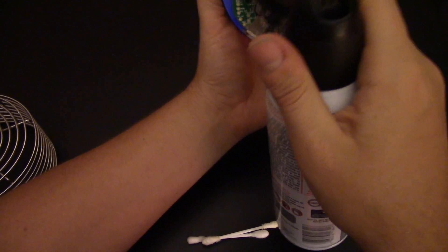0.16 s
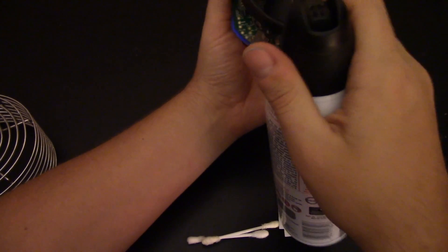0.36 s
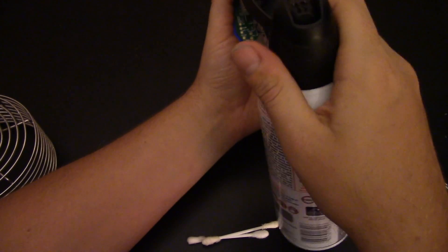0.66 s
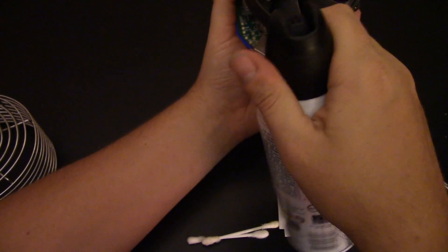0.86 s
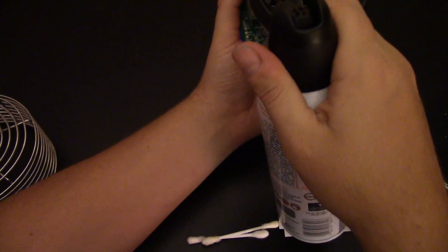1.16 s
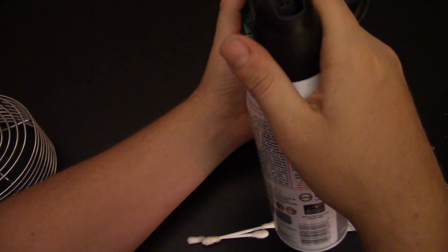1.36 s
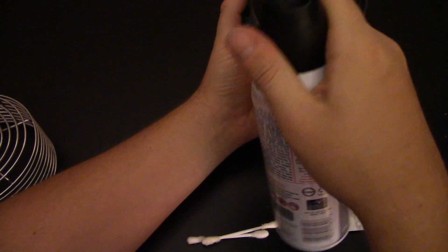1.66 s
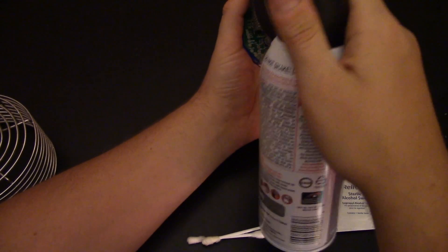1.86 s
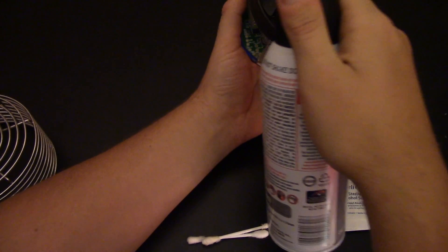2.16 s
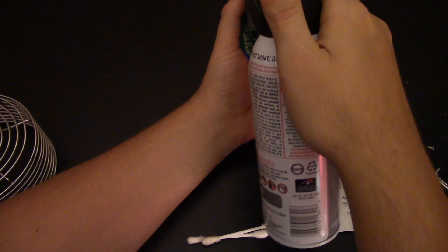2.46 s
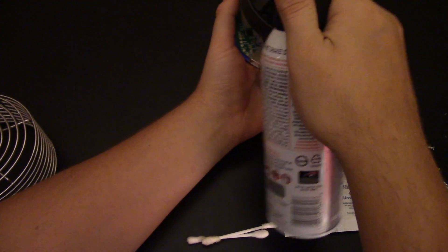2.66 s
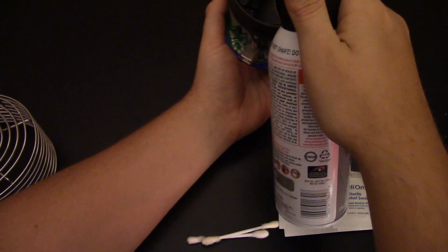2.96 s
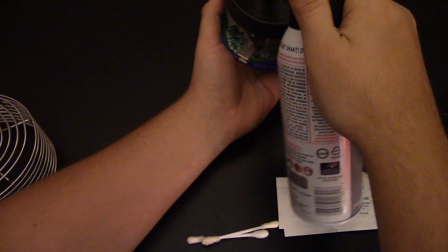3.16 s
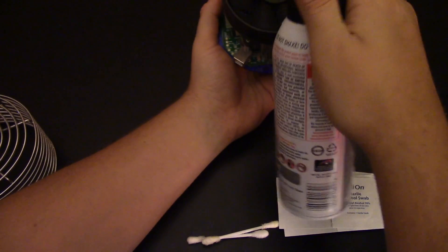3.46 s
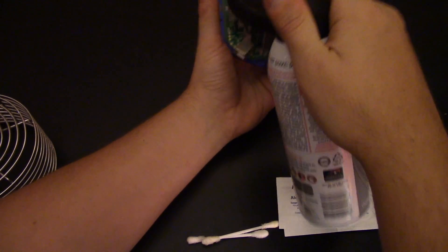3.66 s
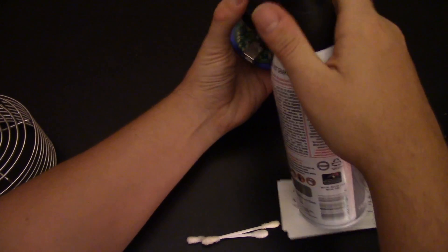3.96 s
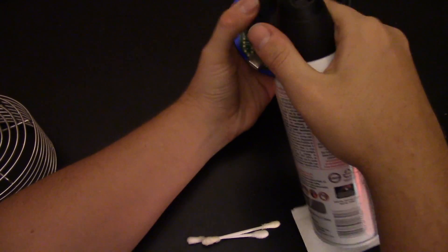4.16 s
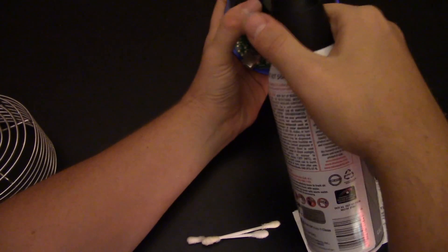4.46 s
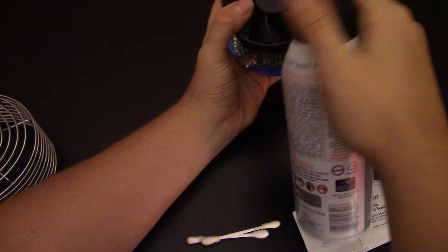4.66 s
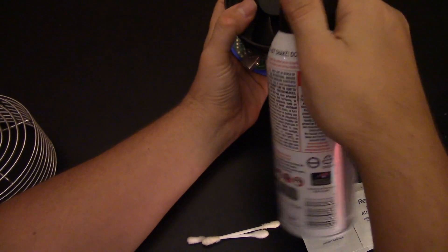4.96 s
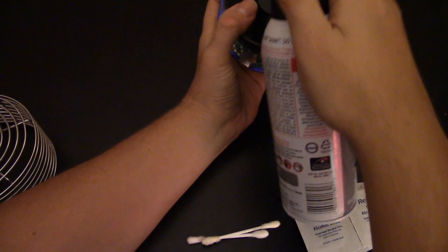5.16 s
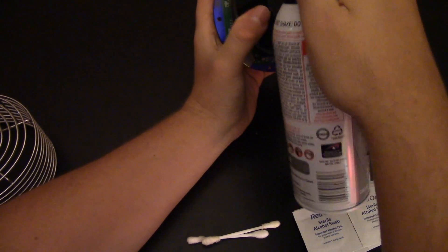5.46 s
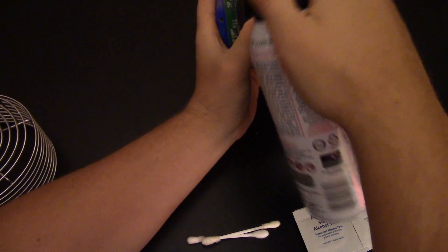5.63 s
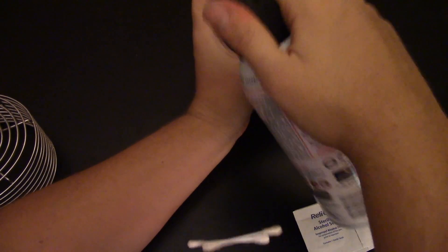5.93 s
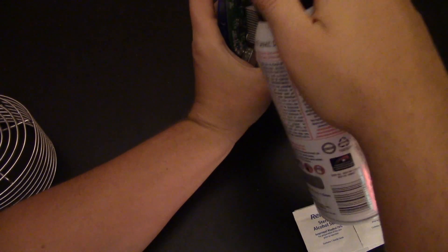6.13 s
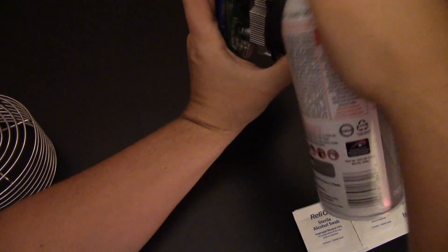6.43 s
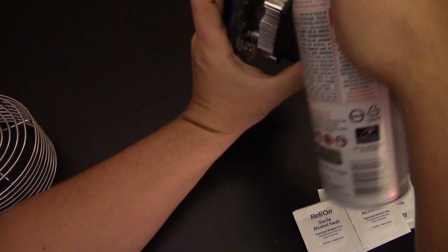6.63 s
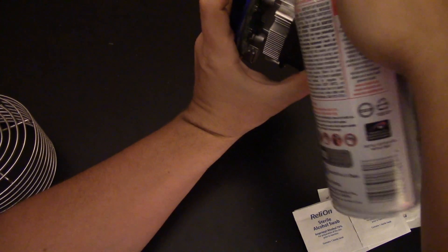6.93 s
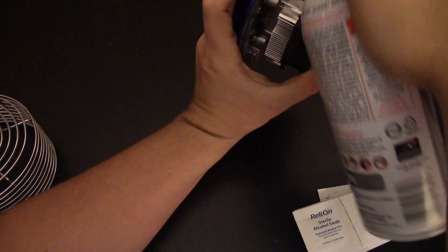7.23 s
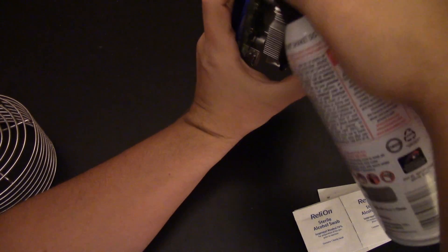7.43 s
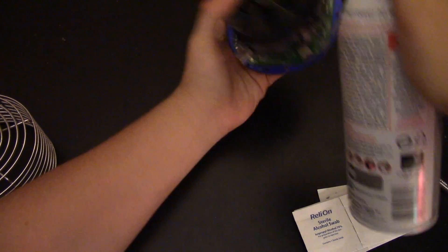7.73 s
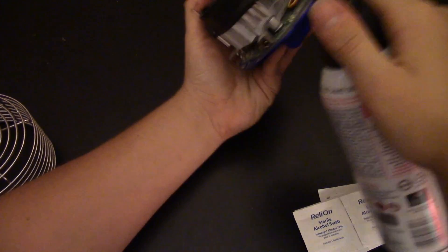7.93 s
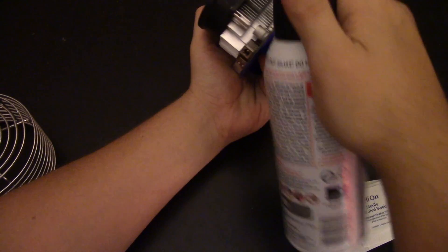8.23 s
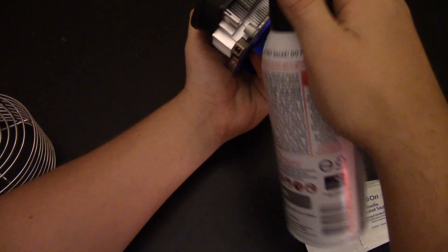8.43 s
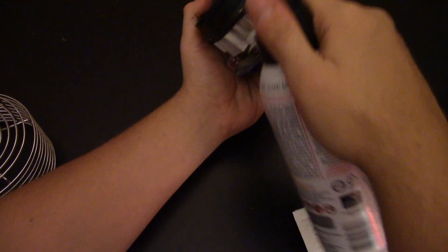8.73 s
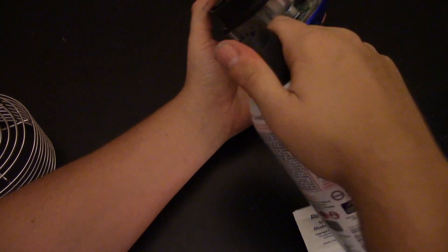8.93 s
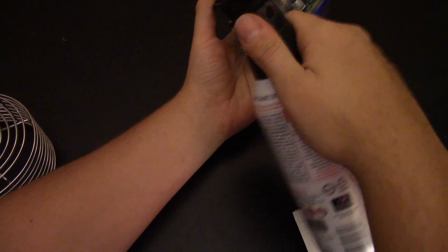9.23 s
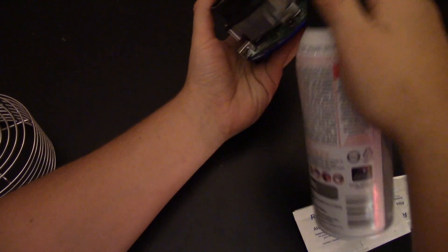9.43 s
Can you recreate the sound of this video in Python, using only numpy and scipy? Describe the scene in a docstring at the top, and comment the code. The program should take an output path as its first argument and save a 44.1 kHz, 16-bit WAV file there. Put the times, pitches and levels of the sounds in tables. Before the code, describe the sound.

A quiet, steady fan drone with a faint wavering midrange hum fills a small room, picked up by a close camera microphone. Around 0.25 s a finger slides and a straw taps; a trigger clicks at 0.4 s. Four hard air bursts follow at about 0.4, 0.8, 1.1 and 1.5 s, each a tiny thin whistle snapping into a loud hiss of about 0.15 s, then shutting with a short ring. A faint click comes at 1.8 s. Three more bursts hit at 2.6, 3.0 and 3.5 s. From 3.9 to 4.8 s there are soft rubs, a bump, a click and plastic taps, with the hum swelling. Eight bursts run from 4.9 to 7.3 s, several thinner and more hollow among the fins. Slight rubs near 8 s lead to four bursts from 8.2 to 9.3 s, with a soft bump at 8.5 s. A last whistle starts near 9.6 s and is cut off. Loud jets briefly duck the level.

```python
"""Close to a camera in a small room, a fan hums throughout and a hand shifts on a can of compressed air.
A finger slides, the straw taps, the trigger clicks; then four short bursts go into a heatsink and fan.
Each starts as a thin whistle in the straw, opens to a hiss coloured by the fins, shuts and leaves the room ringing.
Three more follow from 2.6 s, eight from 4.9 s and four from 8.2 s, with rubs, taps and soft bumps between;
the whistle of one more is cut off at the end. Under loud bursts the camera's gain control ducks everything."""
import sys
import numpy as np
from scipy import signal
from scipy.fft import rfft, irfft, next_fast_len
from scipy.io import wavfile
from scipy.ndimage import uniform_filter1d, minimum_filter1d, map_coordinates

SR = 44100
rng = np.random.default_rng(int(sys.argv[2]) if len(sys.argv) > 2 else 0)


def generate_wav(sig):
    """Save sig (samples, or channels by samples) to the path in sys.argv[1] as 16-bit PCM at SR."""
    pcm = np.round(np.clip(np.atleast_2d(sig).T, -1, 1) * 32767).astype(np.int16)
    wavfile.write(sys.argv[1], SR, pcm)


N = 422919


def spray(leak_db=-24, leak_rise_db=9, creep_db=-15, snap_s=0.002, shut_s=0.0064, flutter_db=-0.4, room_db=-7.5):
    """Each squeeze: the valve cracks and the straw whistles, the full jet hits the fins, the valve shuts."""
    # trigger squeezes: (t/s fully open, lead-in/s, open time/s, level/dB halfway through,
    # depth in the fins/dB, first gap f/Hz, last gap f/Hz, ring/dB)
    squeezes = [(0.435, 0.029, .15, -2.5, -3.5, 1140, 1140, 1.5),
                (.77, .035, .15, -3, -4.5, 1200, 1610, 4.5), (1.127, 0.044, .15, -2.5, -4.5, 7970, 1210, 3),
                (1.452, 0.035, .17, -3, 0.5, 8200, 550, 3), (2.61, 0.034, .18, -6.5, 3.5, 1750, 990, 1.5),
                (3.04, 0.045, .16, -2.5, -0.5, 4100, 1070, 3), (3.502, 0.046, .17, -4, -5.5, 3700, 3000, 3),
                (4.914, 0.037, .15, -5, 0, 700, 1830, 1.5), (5.219, .018, .15, 0, 10.5, 2100, 2140, 1),
                (5.505, .022, 0.18, -5.5, 10.5, 2010, 2930, 0.5),
                (5.823, 0.024, .15, -5.5, -3.5, 1500, 3500, 3),
                (6.218, 0.031, 0.16, -2, 9.5, 7100, 2870, 3.5), (6.572, .03, .17, -5, 1.5, 1450, 5760, 1.5),
                (6.911, .028, .19, -5.5, 11.5, 5600, 5900, 4.5), (7.277, .038, .18, -5.5, 2, 1450, 3660, 3),
                (8.245, 0.035, .18, -7, 1, 3200, 3520, 3.5), (8.591, 0.032, .18, -4.5, 1, 1320, 3350, 5),
                (8.922, 0.037, .17, -6, -2.5, 3450, 3540, 4), (9.263, 0.039, .15, -3, 1, 3300, 1380, 4),
                (9.608, 0.036, .16, -8, 0, 3000, 3000, 3)]
    creep_s = 0.008
    sag_db = 11.5  # fall of pressure over one squeeze
    leak_flutter_db = 2
    track, n = np.zeros(N), SR // 3
    for s, lead, length, level_db, *aim in squeezes:
        t = np.arange(n) / SR - lead
        # the flow creeps up, snaps fully open, and sags as the pressure in the can falls
        snapping_db = creep_db * np.clip(-t / snap_s, 0, 1)
        creeping = np.exp(np.minimum(t + snap_s, 0) / creep_s)
        opening = amp(snapping_db) * creeping
        closing = np.exp(-np.maximum(t - length + shut_s, 0) / shut_s)
        sagging_db = sag_db * (0.5 - np.clip(t / length, 0, 1))
        pressure_db = level_db + sagging_db + flutter_db * wobble(n, 68.1)
        jet = hiss(n, lead, length, *aim) * opening * closing * amp(pressure_db)
        # the leak grows unsteadily until the jet takes over
        cracked = np.interp(t, [-lead, 0.005 - lead, 0, 0.02], [0, 1, 1, 0])
        straw_air = whistle(n) * cracked
        rise_db = leak_rise_db * np.minimum(t / lead + 0.5, 0.5)
        leak = straw_air * amp(leak_db + rise_db + leak_flutter_db * wobble(n, 150))
        air = jet + leak
        add(track, s - lead, air)
        add(track, s - lead, amp(room_db) * room(air))
    return track


def hiss(n, lead, length, depth_db, first_hz, last_hz, ring_db, spread=28):
    """The deeper the straw points, the more hollow the jet; its sweep fades one ringing gap into the next."""
    # spectrum of the jet on the fins: (f/Hz, relative level/dB per Hz)
    jet_spectrum = [(30, -31), (80, -29), (150, -23), (220, -14), (320, -8.5), (700, -6.5), (1150, -5),
                    (1600, -1), (3300, 0), (6000, -.5), (7100, -3), (9500, -1.5), (13000, -3), (15800, -8)]
    # fixed resonances of desk, heatsink and nozzle: (f/Hz, width/Hz, gain/dB)
    body = [(306, 25, 4), (410, 35, 4.5), (536, 28, 5), (833, 30, 4), (950, 80, 3.5), (1540, 200, 3),
            (2410, 100, 3.5), (5443, 80, 3), (8200, 550, 5), (8480, 130, 2.5)]
    # deep between the fins the jet loses both ends of its spectrum: (f/Hz, share of the depth)
    muffle = [(600, 0.99), (3000, 0.072), (12000, 0.79)]
    # a gap rings twice and casts a shadow below its pitch: (multiple of its pitch, share of the ring)
    gap_modes = [(1, 1), (2.3, 1), (.55, -0.98)]

    def gap(pitch, hz):
        modes = [(k * pitch, spread * np.sqrt(abs(k * pitch)), share * ring_db) for k, share in gap_modes]
        return bumps(modes, hz)

    def cavities(hz, t):
        sweep = np.clip((t - lead) / length, 0, 1)
        return (1 - sweep) * gap(first_hz, hz) + sweep * gap(last_hz, hz)

    def colour(hz):
        return along(jet_spectrum, hz) - depth_db * along(muffle, hz) + bumps(body, hz)

    return turbulent(noise(n, colour), depth_db=2.2, drift_db=cavities)


def whistle(n, detune=0.01, stray_db=3):
    """The barely open valve excites the straw's resonances, each a little off in pitch and strength every time."""
    # pipe resonances of the straw: (f/Hz nominal, width/Hz, nominal gain/dB)
    straw = [(2950, 250, 13), (3950, 450, 7), (6050, 550, 12), (7080, 350, 13), (9250, 400, 7),
             (10430, 350, 14), (12700, 550, 15), (13500, 450, 12), (15300, 500, 5)]
    # spectrum of the leaking air: (f/Hz, relative level/dB per Hz)
    leak_spectrum = [(200, -16.5), (1500, -15), (3000, -3.5), (5000, 4.5), (8000, 4.5), (11500, -1),
                     (16000, 5.5)]
    chance = rng.standard_normal((len(straw), 2))
    modes = [(hz * (1 + detune * a), width, db + stray_db * b)
             for (hz, width, db), (a, b) in zip(straw, chance)]
    air = noise(n, lambda hz: along(leak_spectrum, hz) + bumps(modes, hz))
    return turbulent(air, depth_db=2.5)


def hands():
    """Skin slides over the can; the trigger clicks, the straw taps and the can bumps the hand."""
    # fingers sliding on the can: (t/s at the peak, rise/s and equal fall, relative level/dB)
    rubs = [(0.259, .08, -58), (3.974, 0.051, -45), (4.095, .1, -45), (4.294, 0.073, -54),
            (7.96, 0.012, -53), (8.131, .012, -53)]
    # spectrum of sliding skin: (f/Hz, relative level/dB per Hz)
    skin = [(300, -21), (2000, -4.5), (5000, 2.5), (9000, -1), (15000, -15)]
    # the trigger clicks: (t/s, relative level/dB)
    clicks = [(.397, -26), (1.074, -23), (1.844, -34), (4.002, -29)]
    # the straw taps the housing: (t/s, f/Hz, relative level/dB)
    taps = [(.258, 2350, -38), (3.978, 1500, -38), (4.755, 4900, -38), (4.783, 1200, -30)]
    # the can bumps softly against the hand: (t/s, relative level/dB)
    thumps = [(3.909, -49), (8.518, -37)]
    tap_q = 6  # pitch over width
    track, n = np.zeros(N), SR // 3
    t = np.arange(n) / SR
    for s, length, db in rubs:
        stroke = np.sin(np.pi / 2 * np.minimum(t / length, 2)) ** 2
        grip = amp(db + 3 * wobble(n, 220))
        add(track, s - length, grip * stroke * noise(n, lambda hz: along(skin, hz)))
    for s, db in clicks:
        add(track, s, amp(db) * knock(8830, width_hz=6700, t60=0.0059))
    for s, hz, db in taps:
        add(track, s, amp(db) * knock(hz, width_hz=hz / tap_q, t60=0.029))
    for s, db in thumps:
        add(track, s, amp(db) * knock(112, width_hz=30, t60=0.26))
    return track


def knock(hz, width_hz, t60):
    """A light blow: noise in one resonance that swells at once and dies away over t60 seconds."""
    t = np.arange(SR // 3) / SR
    attack = 1 - np.exp(-20 * t / t60)
    return narrow(len(t), hz, width_hz) * amp(-60 * t / t60) * attack


def fan(drone_db=-45.5, throb_db=1.1, hum_hz=685, hum_width_hz=95):
    """A steady fan drones in the room's resonances; its narrow hum swells and fades."""
    # spectrum of the drone: (f/Hz, relative level/dB per Hz)
    drone_spectrum = [(25, -22.5), (70, -17.5), (110, -11.5), (160, -7), (350, 2), (530, -8.5), (800, -5),
                      (1250, -14.5), (1650, -12.5), (2400, -14.5), (4500, -18), (6500, -21.5), (10000, -32),
                      (16000, -37.5)]
    # resonances that colour the drone: (f/Hz, width/Hz, gain/dB)
    drone_modes = [(158.3, 16, 10.5), (212.7, 23, 9.5), (297, 37, 5), (405.4, 46, 5), (1210, 160, 7),
                   (1340, 140, 7.5), (2310, 14, 12), (3030, 160, 5.5), (4450, 143, 5.5), (5850, 450, 4)]
    # course of the narrow hum: (t/s, level/dB)
    hum_course = [(0, -50), (1.901, -51), (3.9, -55), (4.35, -45.5), (4.8, -52.5), (7.8, -57.5)]
    hum_db = np.interp(np.arange(N) / SR, *np.transpose(hum_course))
    rush = noise(N, lambda hz: along(drone_spectrum, hz) + bumps(drone_modes, hz))
    drone = turbulent(rush, depth_db=throb_db)
    return amp(drone_db) * drone + amp(hum_db) * narrow(N, hum_hz, hum_width_hz)


def room(x, delay_s=0.017, build_s=0.0024):
    """The room's answer: a diffuse tail that builds up after a delay, each band dying at its own rate."""
    # decay of the room: (f/Hz, t60/s)
    decay = [(100, 0.053), (500, 0.31), (2000, 0.35), (5000, 0.36), (8000, 0.32), (11000, 0.29),
             (15000, 0.24)]
    # colour of the walls: (f/Hz, relative reflected level/dB)
    walls = [(100, 0.5), (500, 1.5), (1500, -2), (4000, -5), (7500, -2), (10000, -7), (15000, -7)]
    hz, t, z = signal.stft(rng.standard_normal(SR // 2), SR, nperseg=256)
    swell = 1 - np.exp(-np.maximum(t - delay_s, 0) / build_s)
    fade = amp(-60 * t / along(decay, hz)[:, None])
    tail = signal.istft(z * swell * fade, SR, nperseg=256)[1]
    tail = tail / np.linalg.norm(tail)
    return signal.fftconvolve(x, coloured(tail, lambda hz: along(walls, hz)))


def turbulent(x, depth_db, drift_db=lambda hz, t: 0):
    """Patches of the spectrum swell and fade at random, on top of a given drift of colour."""
    hz, t, z = signal.stft(x, SR, nperseg=512)
    field = rng.standard_normal(z.shape)
    field = uniform_filter1d(field, size=4, axis=0)  # across neighbouring bands
    field = uniform_filter1d(field, size=10, axis=1)  # along time
    gain = amp(depth_db * unit(field) + drift_db(hz[:, None], t))
    return unit(signal.istft(z * gain, nperseg=512)[1][:len(x)])


def amp(db):
    """Decibels to gain."""
    return 10 ** (np.asarray(db) / 20)


def unit(x):
    """Scale to rms 1."""
    return x / np.sqrt(np.mean(x ** 2) + 1e-20)


def along(points, hz):
    """(f/Hz, value) points joined on a log axis."""
    f, v = np.transpose(points)
    return np.interp(np.log(hz + 1), np.log(f + 1), v)


def bumps(modes, hz):
    """Summed gain in dB of (f/Hz, width/Hz, gain/dB) resonances."""
    return sum(db / (1 + (2 * (hz - centre) / width) ** 2) for centre, width, db in modes)


def coloured(x, gain_db):
    """Filter x by a dB function of frequency."""
    n = x.shape[-1]
    m = next_fast_len(n + SR // 10)
    gain = amp(gain_db(np.fft.rfftfreq(m, 1 / SR)))
    return irfft(rfft(x, m) * gain, m)[..., :n]


def noise(n, gain_db):
    """Coloured noise of rms 1."""
    return unit(coloured(rng.standard_normal(n), gain_db))


def narrow(n, centre, width):
    """Noise through one resonance."""
    return noise(n, lambda hz: -20 * np.log10(1 + (2 * (hz - centre) / width) ** 2))


def wobble(n, rate):
    """A smooth random curve, rate knots a second."""
    knots = rng.standard_normal(n // 20 + 4)
    return map_coordinates(knots, [np.arange(n) * rate / SR], mode="wrap")


def add(track, s, sound):
    """Mix a sound into the track at time s."""
    start = max(round(s * SR), 0)
    part = sound[:max(N - start, 0)]
    track[start:start + len(part)] += part


def scene():
    """Spray, hands and fan reach two closely spaced microphones almost alike."""
    # diffuse difference between the microphones: (f/Hz, side level/dB)
    side_width = [(30, -9.5), (80, 5), (170, -7.5), (350, -15), (700, -17), (1400, -27.5), (3000, -27.5),
                  (6000, -27), (15000, -39)]
    handling = hands()
    handling_in_room = handling + amp(-4.5) * room(handling)[:N]
    background = amp(0.5) * handling_in_room + fan()
    mid = spray() + background
    # only the diffuse background differs between the microphones
    side = coloured(room(background)[:N], lambda hz: along(side_width, hz))
    return np.array([mid + side, mid - side])


def gain_control(x, threshold_db=-14, release_db_per_s=170):
    """The gain drops just ahead of a loud sound, holds a moment and climbs back at a steady rate."""
    slope = 0.65  # dB of cut per dB above the threshold
    window = SR // 100
    # the shifted windows look slightly ahead
    power = np.abs(uniform_filter1d(np.mean(x ** 2, axis=0), window, origin=window // 4))
    cut_db = slope * np.maximum(10 * np.log10(power + 1e-12) - threshold_db, 0)
    held_db = -minimum_filter1d(-cut_db, window, origin=window // 3)  # the largest cut in the window
    recovery_db = release_db_per_s * np.arange(N) / SR
    return x * amp(recovery_db - np.maximum.accumulate(held_db + recovery_db))


def record(dry):
    """The camera rides its gain, rounds the highest peaks and keeps nothing above its band limit."""
    top_hz, edge_hz = 15850, 600
    x = gain_control(dry)
    x = x / (1 + x ** 6) ** (1 / 6)
    return coloured(x, lambda hz: -120 * np.clip((hz - top_hz) / edge_hz, 0, 1))


dry = scene()
out = record(dry)
generate_wav(out)
```